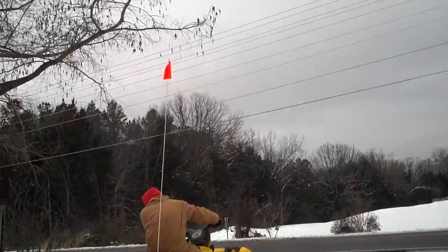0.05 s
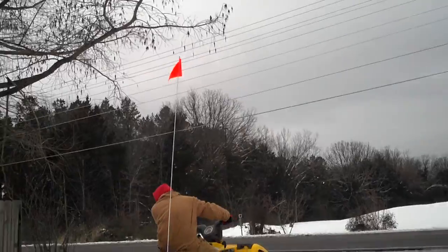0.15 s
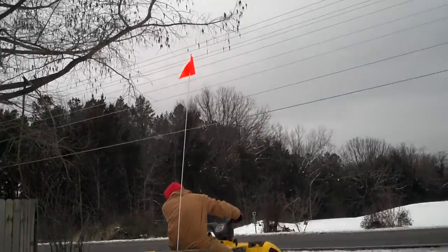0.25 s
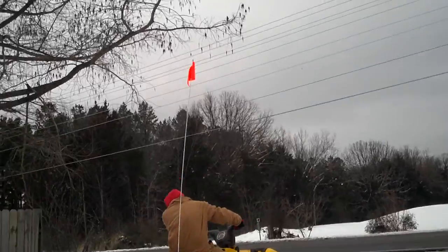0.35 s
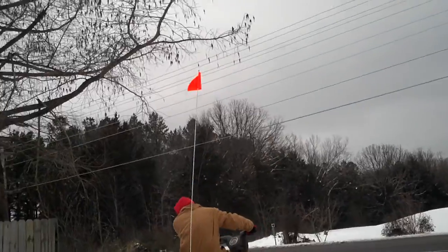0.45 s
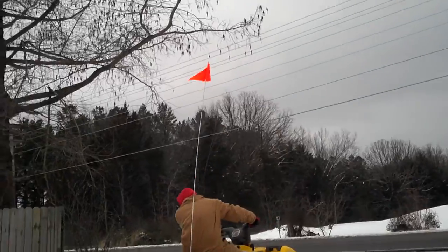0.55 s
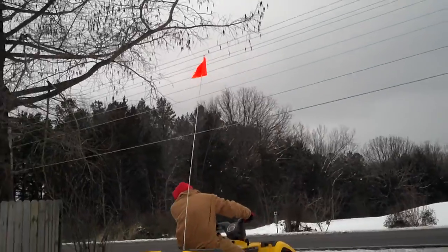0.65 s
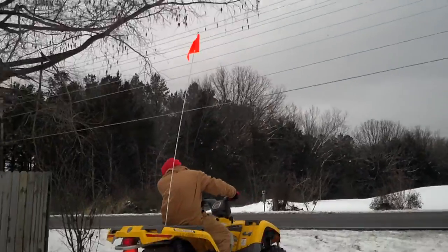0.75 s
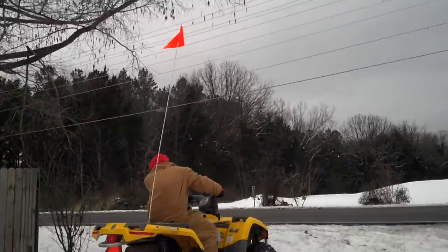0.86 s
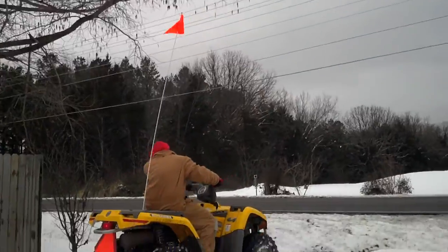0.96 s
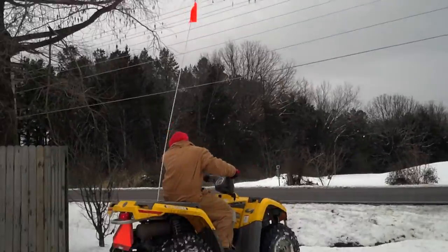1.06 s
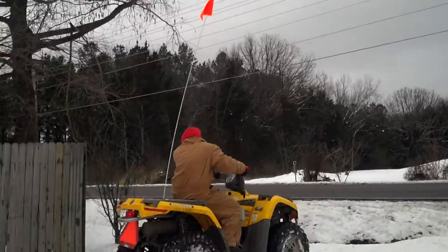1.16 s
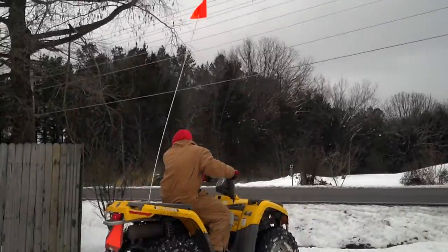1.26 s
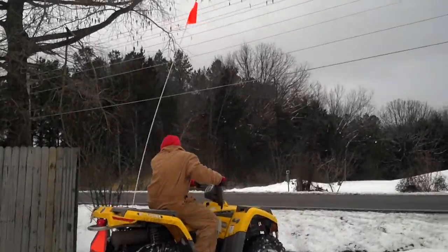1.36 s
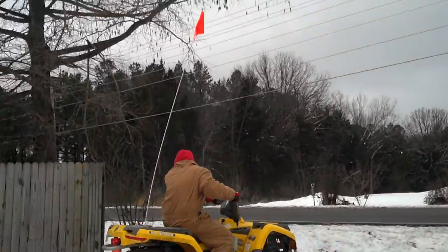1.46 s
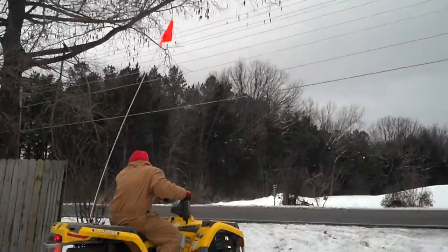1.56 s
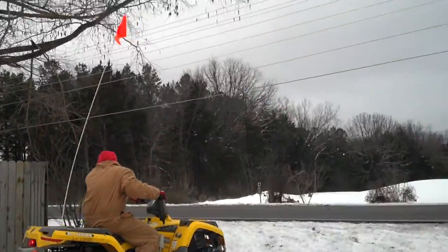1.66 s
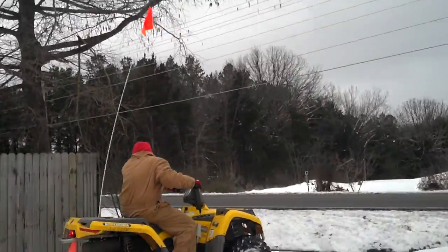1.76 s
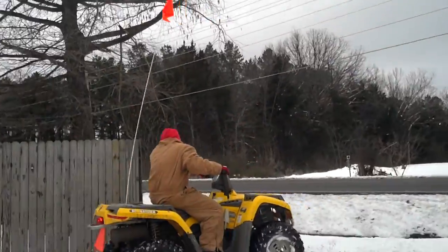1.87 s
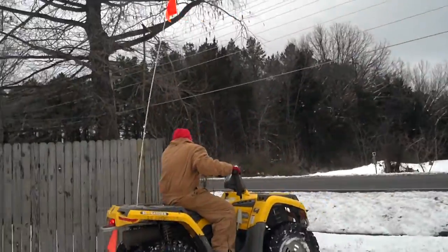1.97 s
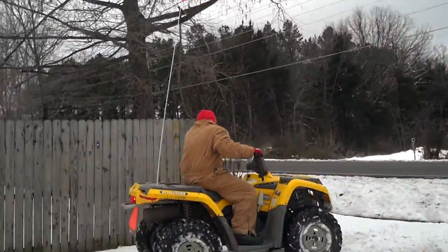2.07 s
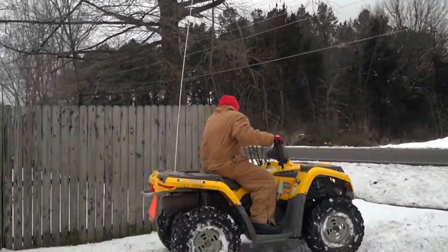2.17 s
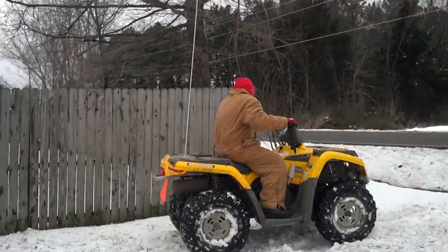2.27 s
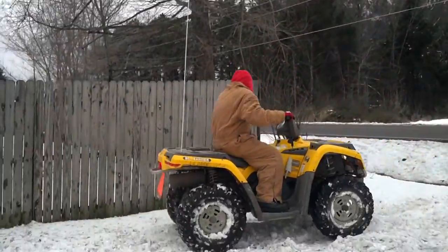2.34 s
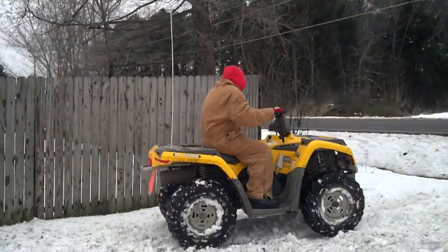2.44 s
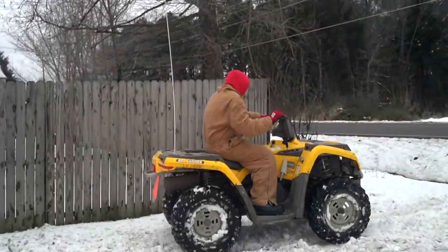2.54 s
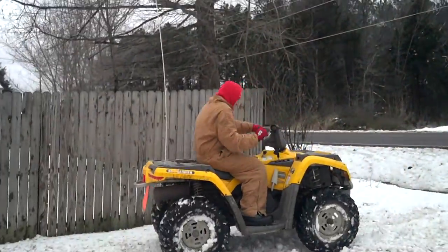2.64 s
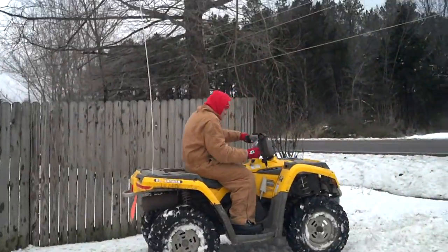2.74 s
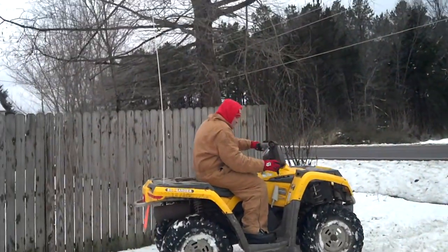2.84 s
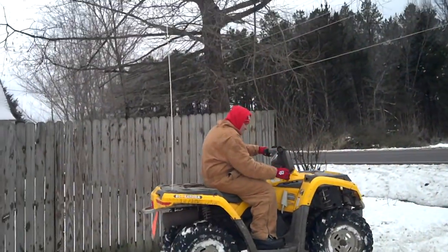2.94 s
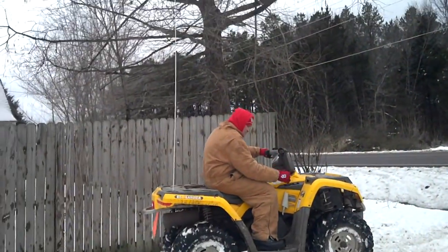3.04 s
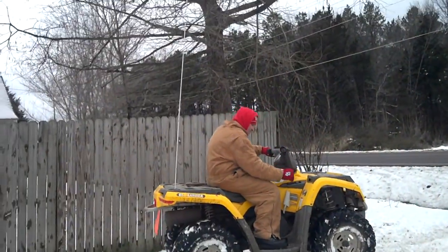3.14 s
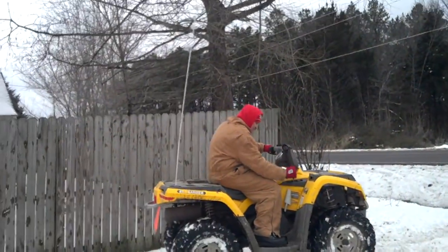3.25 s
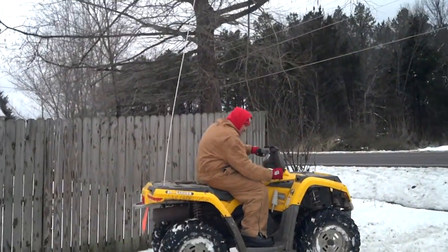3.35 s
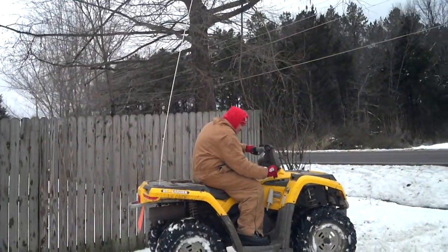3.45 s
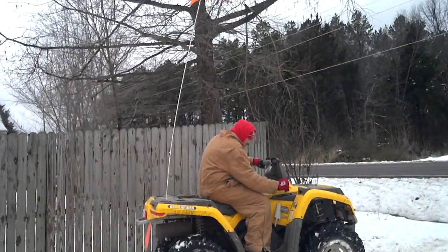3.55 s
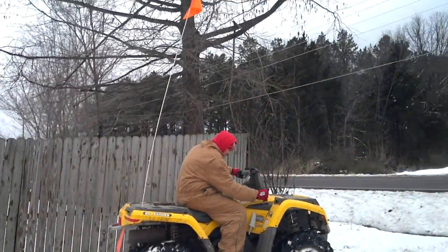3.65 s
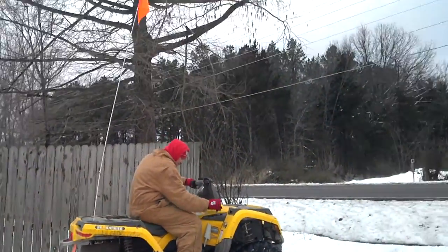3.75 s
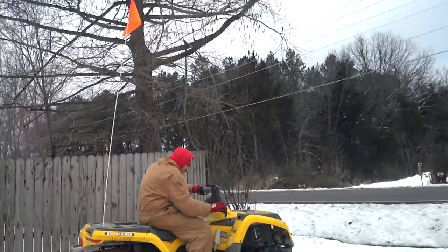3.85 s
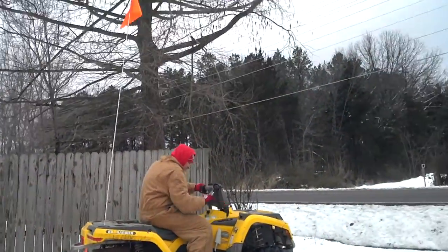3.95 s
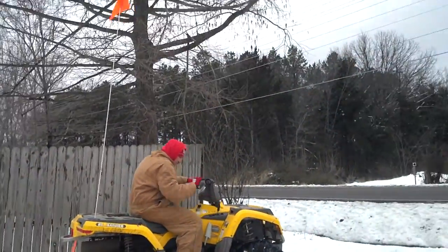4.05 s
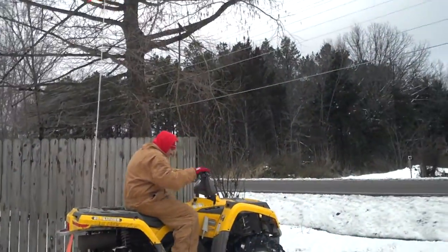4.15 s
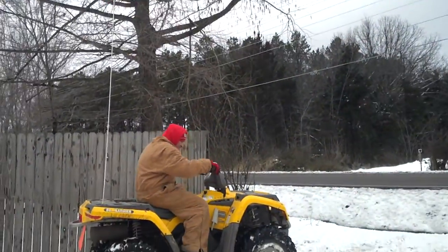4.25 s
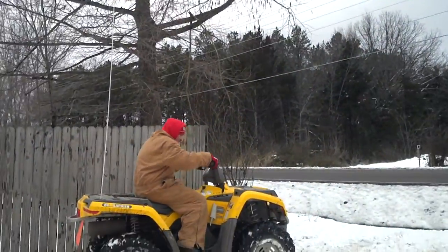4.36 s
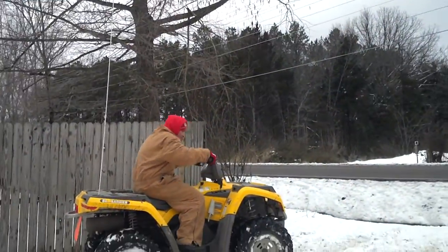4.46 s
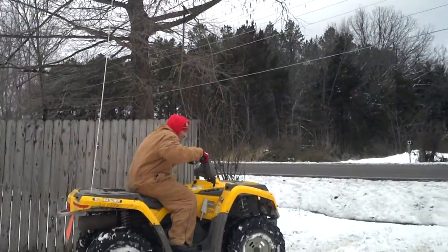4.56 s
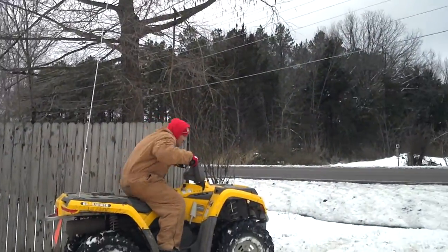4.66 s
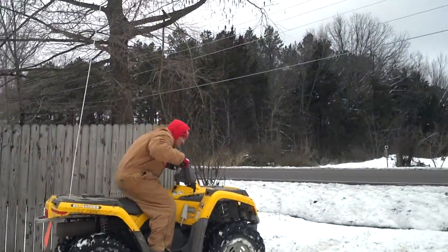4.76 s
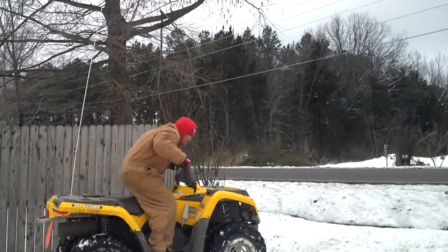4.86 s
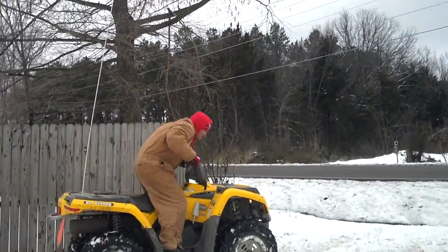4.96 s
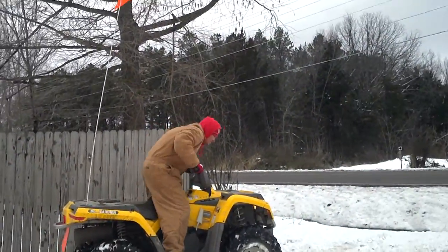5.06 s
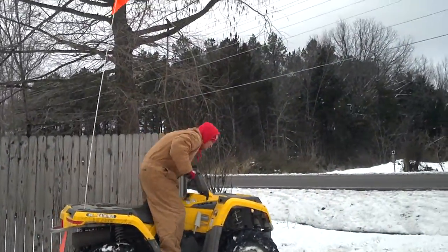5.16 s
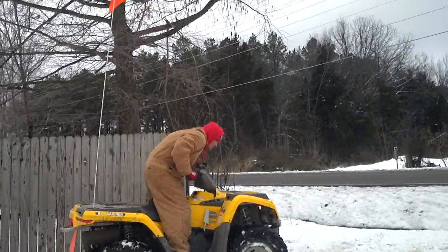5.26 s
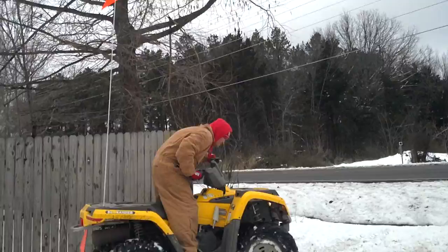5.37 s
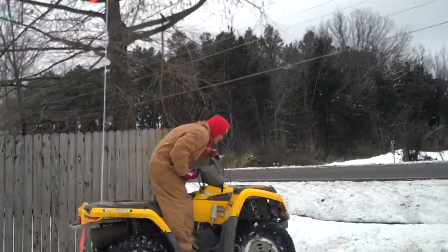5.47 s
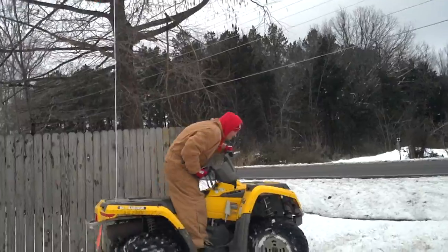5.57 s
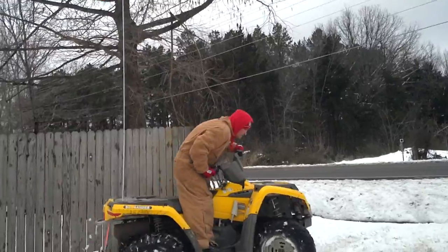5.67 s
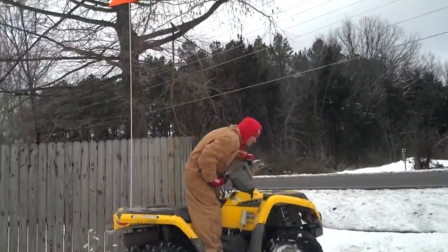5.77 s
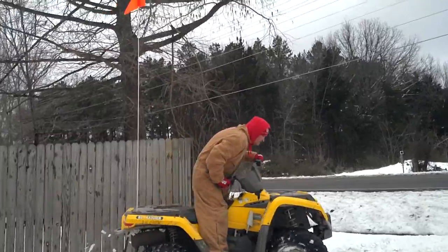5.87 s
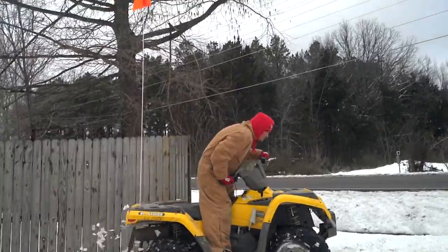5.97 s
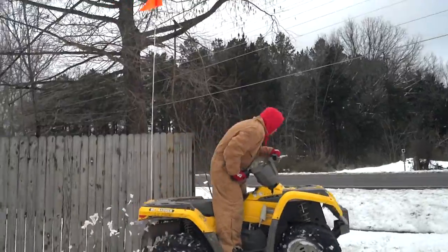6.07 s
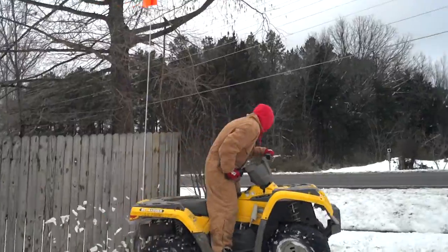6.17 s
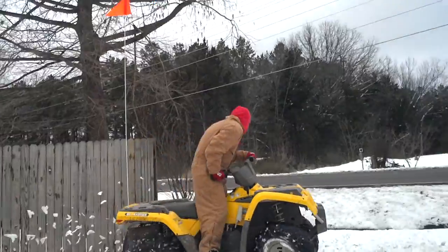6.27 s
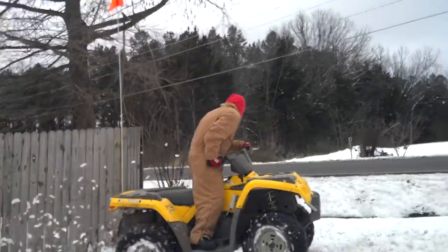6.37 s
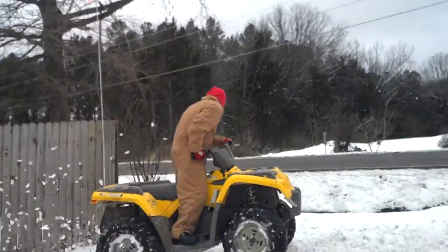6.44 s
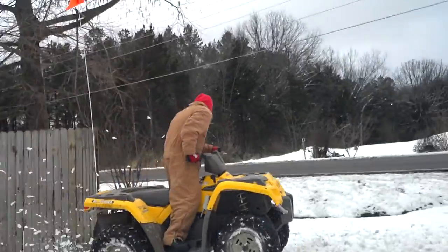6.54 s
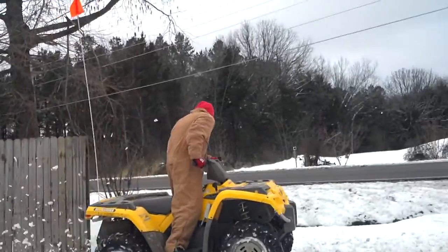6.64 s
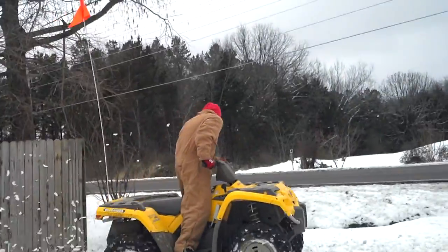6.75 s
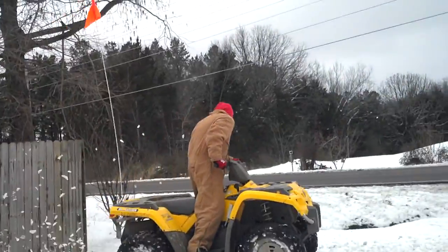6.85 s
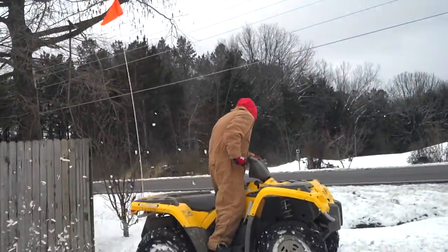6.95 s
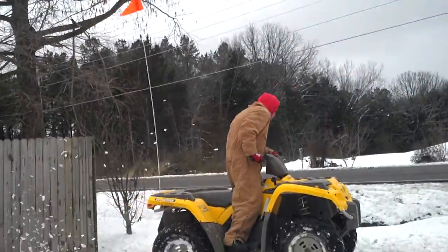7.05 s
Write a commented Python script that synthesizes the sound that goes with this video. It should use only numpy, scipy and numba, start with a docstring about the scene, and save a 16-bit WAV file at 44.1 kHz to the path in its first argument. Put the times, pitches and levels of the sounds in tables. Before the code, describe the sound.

Close by in a snowy yard, an all-terrain vehicle drives with a throaty, rattling engine and brief whines from its drive. It slows with a few uneven firings to a chugging idle, during which the gear lever gives a series of metallic clacks. Then the throttle opens and the engine climbs to a strong, sustained roar. Snow hisses beneath the tyres, most clearly while the engine is revving.

```python
"""Quad bike in a snowy yard

A single-cylinder engine revs, stumbles down to idle, a gear lever clacks, and it revs again. Each firing
rings the silencer and tailpipe; gas puffs, the casing rattles and snow hisses under the spinning wheels.
A fence echoes the bike. Two close microphone ports feed a stereo widener."""
import sys
import numpy as np
from scipy import signal
from scipy.fft import rfft, irfft, next_fast_len
from scipy.io import wavfile
from scipy.ndimage import uniform_filter1d, map_coordinates
from numba import njit

SR = 44100
rng = np.random.default_rng(int(sys.argv[2]) if len(sys.argv) > 2 else 0)


def bounce(signal):
    """Save signal as a 16-bit WAV file at the path given by the first command-line argument."""
    frames = np.transpose(np.atleast_2d(signal))
    limited = np.clip(frames, -1, 1)
    pcm = np.round(limited * 32767).astype(np.int16)
    wavfile.write(sys.argv[1], SR, pcm)


N = 313551
TIME = np.arange(N) / SR
IDLE_HZ, WIDENER_LAG_SAMPLES = 10, 17
# engine speed: time_s, firing_hz
ENGINE_SPEED = [(0.0, 36.23), (0.58, 38.41), (1.27, 33.63), (1.42, 33.88), (1.88, 24.96), (2.4, 18.32),
                (2.85, 14.35), (3.7, 10.67), (4.26, 9.67), (4.58, 10.32), (4.62, 14.0), (5.06, 24.48),
                (5.41, 30.08), (5.62, 36.13), (6.01, 44.12), (6.39, 45.55), (7.11, 43.75)]
# cylinder filling as the throttle opens, shuts, idles and opens again: time_s, load (0-1)
ENGINE_LOAD = [(0, 0.79), (1.55, 0.86), (1.62, 0), (2.62, 0.31), (2.76, 0.57), (4.49, 0.68), (4.53, 0.92),
               (7.11, 0.95)]


def undb(db):
    return 10 ** (np.asarray(db) / 20)


def curves(table):
    """One automation curve for each column after time_s."""
    time_s, *columns = np.transpose(table)
    return [np.interp(TIME, time_s, column) for column in columns]


def delay(x, samples):
    """Delay by any fraction of a sample."""
    return map_coordinates(x, [np.arange(N) - samples], order=3, mode="nearest")


def unit(x):
    """Scale so that a centred sound has rms 1 after the widener's subtraction."""
    return x / np.std(x[WIDENER_LAG_SAMPLES:] - x[:-WIDENER_LAG_SAMPLES])


@njit
def bandpass(x, hz, width):
    """State-variable band-pass with moving centre and width, gain 1 at the centre."""
    y, band_state, low_state = np.empty(len(x)), 0., 0.
    for i in range(len(x)):
        g, k = np.tan(np.pi * hz[i] / SR), width[i] / hz[i]
        band = (band_state + g * (x[i] - low_state)) / (1 + g * (g + k))
        band_state, low_state = 2 * band - band_state, low_state + 2 * g * band
        y[i] = k * band
    return y


def ring(x, mode, pitch=1., damping=0.88):
    """One resonance; pitch and damping multiply its base frequency and width."""
    hz, width, db = mode
    steady = np.ones(len(x))
    return undb(db) * bandpass(x, hz * pitch * steady, width * damping * steady)


def wander(rate_hz):
    """Smooth random drift with a spread near 1."""
    hold = int(SR / rate_hz)
    steps = np.repeat(rng.standard_normal(N // hold + 1), hold)
    return 1.29 * uniform_filter1d(uniform_filter1d(steps, hold), hold)[:N]


def noise(spectrum, flicker_db=0, flicker_hz=1):
    """Coloured noise whose third-octave bands can each flicker alone."""
    size = next_fast_len(N)
    octave = np.log2(np.maximum(np.arange(size // 2 + 1) * SR / size, 1.))
    hz, db = np.transpose(spectrum)
    knots = np.log2(hz)
    colour = rfft(rng.standard_normal(size)) * undb(np.interp(octave, knots, db, left=-200, right=-200))
    out = np.zeros(N)
    for centre in np.arange(knots[0], knots[-1] + 1 / 3, 1 / 3):
        band = irfft(colour * np.clip(1 - 3 * abs(octave - centre), 0, 1), size)[:N]
        out += undb(flicker_db * wander(flicker_hz)) * band
    return unit(out)


def impulses(times, sizes):
    """Impulses, each shared between two samples."""
    at, out = np.clip(times * SR, 0, N - 2), np.zeros(N)
    i = at.astype(int)
    np.add.at(out, i, sizes * (1 - at + i))
    np.add.at(out, i + 1, sizes * (at - i))
    return out


def firings(rate, load):
    """One exhaust stroke per engine cycle, more uneven in strength as the cylinder empties."""
    # lone firings that catch with the throttle shut: time_s, boost_db
    catches = [(1.587, 0), (1.761, 5), (1.915, 2.5), (2.043, 7), (2.274, 7.5), (2.434, 5), (2.608, 6)]
    cycles = 0.016 + np.cumsum(rate) / SR
    times = np.interp(np.arange(int(cycles[-1]) + 1), cycles, TIME)
    firing_hz = np.interp(times, TIME, rate)
    jitter, strength = rng.standard_normal((len(times), 2)).T
    catch_db = sum(db * (np.abs(times - s) < .4 / firing_hz) for s, db in catches)
    spread_db = .5 + 1.8 * (1 - np.interp(times, TIME, load))
    return cycles, times + 0.004 * jitter / firing_hz, firing_hz, catch_db + spread_db * strength


def exhaust(rate, load, times, firing_hz, accent_db):
    """Each pressure pulse rings silencer and tailpipe; the intake gulps about half a cycle later."""
    # silencer chambers in a row, beating: base_pitch_hz, base_width_hz, gain_db
    chambers = [(104.6, 7.35, 10), (121.4, 20.5, 0)]
    # tailpipe sections in a row: base_pitch_hz, base_width_hz, gain_db
    pipes = [(219.5, 57, 1.5), (251, 67, 1.5)]
    overtone = (342, 107, 0)  # of the tailpipe, same columns
    # silencer boom: time_s, level_db
    boom_levels = [(0, -29), (1.2, -28.5), (1.6, -25), (1.74, -29), (1.8, -23.5), (1.88, -23), (2.0, -30.5),
                   (2.65, -32.5), (3.3, -23.5), (3.55, -28), (4.25, -24), (4.48, -24), (4.56, -24),
                   (5.5, -27), (7.11, -28)]
    pulse_s = 0.0048
    pulse = np.cos(np.pi * np.clip(np.arange(-300, 301) / SR / pulse_s, -.5, .5)) ** 2
    size = undb(accent_db) / np.sqrt(firing_hz)
    intake = undb(-19) * impulses(times + 0.4245 / firing_hz, size)
    blow = signal.fftconvolve(impulses(times - pulse_s, size) + intake, pulse, "same")
    heat = 0.93 + 0.0073 * (rate - IDLE_HZ) + 0.11 * load  # hot, fast gas raises the modes
    flow = np.interp(TIME, times, firing_hz / IDLE_HZ) ** 0.97  # faster gas damps them
    damping = 0.44 + 0.56 * load
    boom = ring(blow, chambers[0], heat, flow * damping)
    boom = ring(boom, chambers[1], heat, flow ** 1.49 * damping) / np.sqrt(flow * damping)
    pipe_damping = flow ** 0.6 * damping
    bark = ring(blow, pipes[0], heat, pipe_damping)
    bark = ring(bark, pipes[1], heat, pipe_damping) / np.sqrt(pipe_damping)
    bark -= load ** 3.8 * ring(ring(blow, overtone, heat), overtone, heat)  # speaks only under load
    boom_db, = curves(boom_levels)
    bark_db = -45.5 + 10.5 * load + 5 * np.log2(rate / IDLE_HZ)
    # in opposite polarity the two add between their modes
    return undb(boom_db) * unit(boom) - undb(bark_db) * unit(bark)


def gas_puffs(rate, load, cycles, times, accent_db):
    """Envelopes for roar and hiss: gas cracks as the valve opens and rushes for part of each cycle."""
    # engine roar: time_s, level_db
    roar_levels = [(0, -27), (.3, -28), (.65, -23.5), (1.05, -24), (1.22, -21.5), (1.37, -26),
                   (1.78, -26.5), (1.9, -33.5), (2.25, -35.5), (3.4, -38), (4.1, -37), (4.3, -36),
                   (4.49, -36), (4.53, -28.5), (4.92, -32), (5.1, -28), (5.4, -28), (5.6, -25), (6.45, -23),
                   (7.11, -26)]
    # the idling machine shudders as the lever is worked: time_s, boost_db
    shudders = [(2.56, 3), (2.67, 4.5), (3.62, 4.5), (3.79, 6)]
    shudder_s, crack_lead_s, crack_decay_s = 0.038, .008, .007
    roar_db, = curves(roar_levels)
    roar_db += sum(db * np.exp(-((TIME - s) / shudder_s) ** 2) for s, db in shudders)
    level, accent = undb(roar_db + 1.02 * wander(10)), undb(accent_db)
    stroke, phase = np.divmod(cycles + 0.31, 1)
    rush = (1 - np.exp(-(phase / 0.057) ** 2)) * np.exp(-(phase / 0.33) ** 3)
    rush = rush / rush.mean() * accent[np.minimum(stroke.astype(int), len(accent) - 1)]
    decay = np.exp(-TIME[TIME < 8 * crack_decay_s] / crack_decay_s)
    openings = impulses(times - crack_lead_s, np.gradient(times) * SR * accent)
    crack = signal.fftconvolve(openings, decay / decay.sum())[:N].clip(0)
    # puffs stand out under load and blur together at speed
    depth = np.clip(load ** 2.53 * (1.178 - 0.035 * (rate - IDLE_HZ)), 0, .97)
    grit = undb(1.8 * wander(350)) ** 2
    puffs = [((1 - share) * rush + share * crack) * grit / grit.mean() for share in (0.65, 0.62)]
    return [level * np.sqrt(1 - depth + depth * puff) for puff in puffs]


def engine_roar():
    """Gas noise, and valve-gear rattle ringing the casing, each panel swelling alone."""
    # gas noise spectrum: frequency_hz, density_db
    gas_spectrum = [(340, 2.5), (500, -10.5), (620, -2.5), (800, -4), (1300, -7), (2000, -11.5),
                    (2800, -15)]
    # casing and panel modes: pitch_hz, base_width_hz, gain_db
    panels = [(660, 10.5, 0.5), (787.6, 65, 0.5), (856, 44, 4.5), (936, 39, -0.5), (1010, 16, -7.5),
              (1252, 33, -1.5), (1360, 13, -39), (1415, 16, 6), (1612, 21, -7.5), (1620, 52, 4)]
    rattle = rng.standard_normal(N) * undb(3.1 * rng.exponential(size=N))
    casing = sum(undb(4.6 * wander(6)) * ring(rattle, mode) for mode in panels)
    return unit(noise(gas_spectrum) + undb(-1.5) * unit(casing))


def snow_hiss():
    """Snow under the wheels: a flickering hiss topped by a smoother sizzle."""
    # hiss and sizzle spectra: frequency_hz, density_db
    hiss_spectrum = [(1300, -8), (2000, 9), (3000, -2.5), (4000, 0.5), (5200, 2.5), (6500, -2), (8000, -11)]
    sizzle_spectrum = [(7000, 6.5), (8500, 1.5), (10500, -2), (12000, 2), (13000, -25), (15500, -4)]
    # treble balance: time_s, hiss_db, sizzle_against_hiss_db
    balance = [(0, -12, -4.5), (.4, -11.5, -13), (.9, -14, -10), (1.3, -12.5, -9.5), (1.4, -12, -4),
               (1.8, -11, -7), (2.2, -11.5, -14), (2.5, -12, -22), (3.0, -13, -14.5), (3.8, -12.5, -16),
               (3.9, -15.5, -12.5), (4.53, -16, -11.5), (4.95, -11, -10), (6.2, -11.5, -15),
               (6.8, -14, -12.5), (7.11, -13, -11.5)]
    hiss_db, sizzle_db = curves(balance)
    hiss = noise(hiss_spectrum, flicker_db=3, flicker_hz=14)
    return np.sqrt(2) * undb(hiss_db) * (hiss + undb(sizzle_db) * noise(sizzle_spectrum))


def lever_clacks():
    """Each move of the gear lever rattles its metal modes and knocks the frame."""
    # lever and linkage hits: start_s, level_db, knock_against_metal_db
    hits = [(2.5706, -31, -1), (2.6623, -34, 4), (3.264, -27, 3), (3.4845, -30, -4), (3.5498, -23, 0),
            (3.5952, -31, -2), (3.6267, -32, 0), (3.688, -37, 4), (3.7633, -32, 3), (3.7918, -31, 1)]
    # lever modes: pitch_hz, base_width_hz, gain_db
    modes = [(3270, 330, 1), (4000, 190, 4), (4410, 180, 10.5), (5700, 210, 0), (6180, 260, 1),
             (7400, 230, -9)]
    frame_mode = (1380, 540, 0)
    out, t = np.zeros(N + 3000), np.arange(3000) / SR
    for start_s, level_db, knock_db in hits:
        shake = rng.standard_normal((2, len(t))) * (np.exp(-t / .001) + .22 * np.exp(-t / .008))
        chance = rng.standard_normal(len(modes))
        colour_db = chance + np.clip(chance, -1, 1)
        metal = sum(undb(db) * ring(ring(shake[0], mode), mode, damping=2.2)
                    for mode, db in zip(modes, colour_db))
        knock = ring(shake[1], frame_mode)
        clack = metal / abs(metal).max() + undb(knock_db) * knock / abs(knock).max()
        i = int(start_s * SR)
        out[i:i + len(t)] += np.sqrt(2) * undb(level_db) * clack
    return out[:N]


def drive_whines():
    """Short, rough gliding tones, likely from the drive belt and gears."""
    # whines: start_s, end_s, from_hz, to_hz, level_db
    glides = [(0.35, .41, 900, 888, -32), (0.415, 0.57, 745, 766, -31.5), (0.887, 0.98, 1030, 1015, -29),
              (0.928, 1.096, 860, 817, -30.5), (1.07, 1.317, 790, 731, -27),
              (1.115, 1.285, 1425, 1407, -34.5), (1.078, 1.262, 1265, 1302, -33),
              (1.273, 1.446, 895, 860, -29), (1.453, 1.565, 705, 675, -29.5),
              (1.484, 1.598, 1290, 1260, -33), (1.487, 1.556, 885, 884, -29),
              (1.83, 1.98, 1300, 1283, -36.5), (5.002, 5.92, 1720, 1705, -39.5)]
    out, roughness = np.zeros(N), undb(1.3 * wander(25.22))
    waver = 1 + 0.0031 * wander(30)
    for start_s, end_s, from_hz, to_hz, level_db in glides:
        progress = np.clip((TIME - start_s) / (end_s - start_s), 0, 1)
        pitch_hz = (from_hz + (to_hz - from_hz) * progress) * waver
        fade = np.sqrt(np.sin(np.pi * progress).clip(0))
        out += undb(level_db) * fade * np.sin(2 * np.pi * np.cumsum(pitch_hz) / SR)
    return roughness * out


def yard_air():
    """Moving air rumbles faintly at a microphone port."""
    # rumble spectrum: frequency_hz, density_db
    spectrum = [(20, -8), (45, 5), (100, 13), (250, -9), (500, -37)]
    return undb(-52.5) * noise(spectrum, flicker_db=3, flicker_hz=4.1)


def scene():
    """The bike and its fence echo reach the left port first; each port has its own hiss and air."""
    (rate,), (load,) = curves(ENGINE_SPEED), curves(ENGINE_LOAD)
    cycles, times, firing_hz, accent_db = firings(rate, load)
    roar_envelope, hiss_envelope = gas_puffs(rate, load, cycles, times, accent_db)
    bike = exhaust(rate, load, times, firing_hz, accent_db) + roar_envelope * engine_roar()
    bike += drive_whines() + lever_clacks()
    fence_s, fence_db = .02, -14
    bike += undb(fence_db) * delay(bike, fence_s * SR)
    lead_samples, lead_db = 5.54, 1.0
    ports = np.array([undb(side * lead_db) * delay(bike, -side * lead_samples) for side in (.5, -.5)])
    # scattered sound arrives later, in opposite polarity at the two ports
    scattered = undb(-31.0) * delay(bike - delay(bike, 8.4), .031 * SR) * np.array([[1], [-1]])
    return ports + scattered + np.array([hiss_envelope * snow_hiss() + yard_air() for _ in range(2)])


def record(dry):
    """Stereo widener: each channel loses a delayed copy of the other; then low and high cuts."""
    wide = dry.copy()
    wide[:, WIDENER_LAG_SAMPLES:] -= dry[::-1, :-WIDENER_LAG_SAMPLES]
    wide = signal.sosfilt(signal.butter(2, 64, "high", fs=SR, output="sos"), wide)
    return signal.sosfilt(signal.ellip(10, .2, 70, 15800, fs=SR, output="sos"), wide)


dry = scene()
out = record(dry)
bounce(out)
```